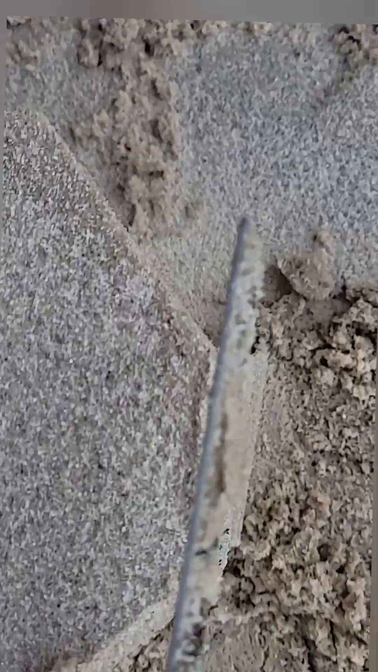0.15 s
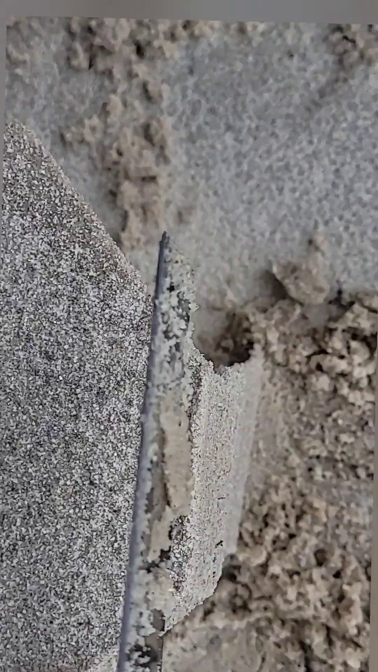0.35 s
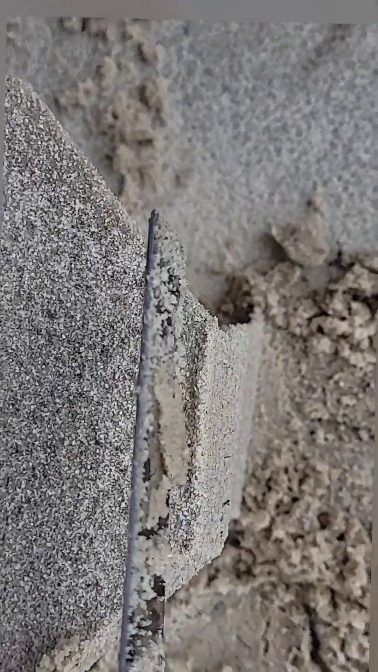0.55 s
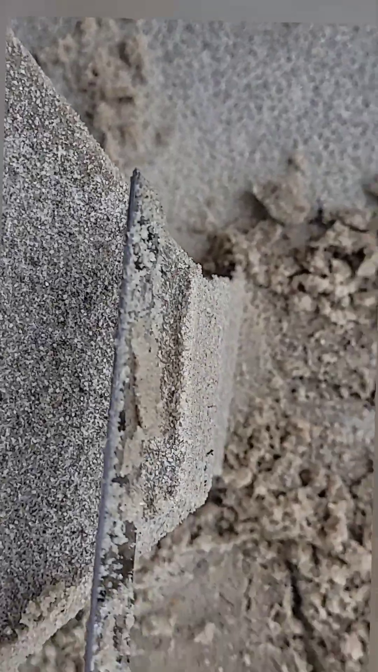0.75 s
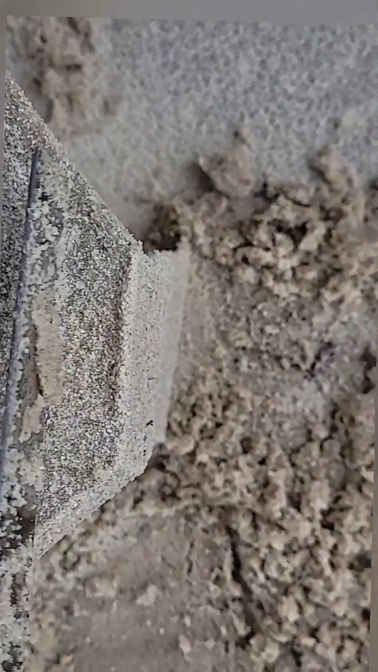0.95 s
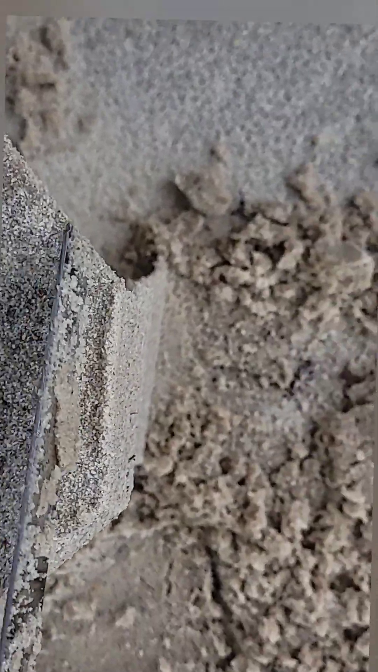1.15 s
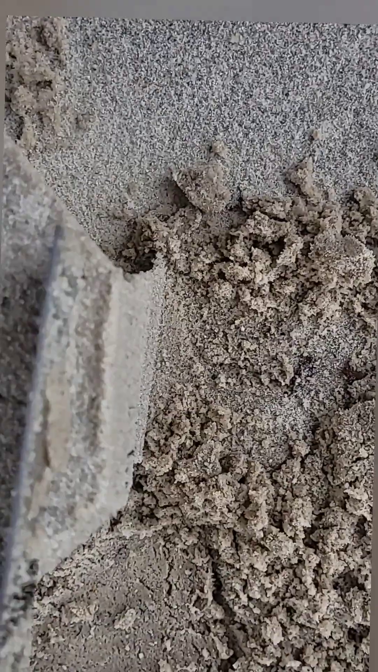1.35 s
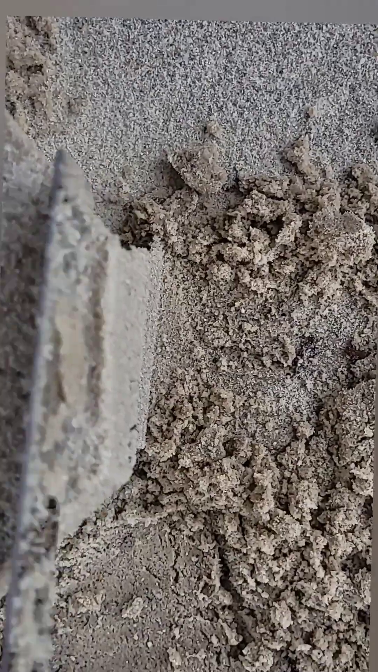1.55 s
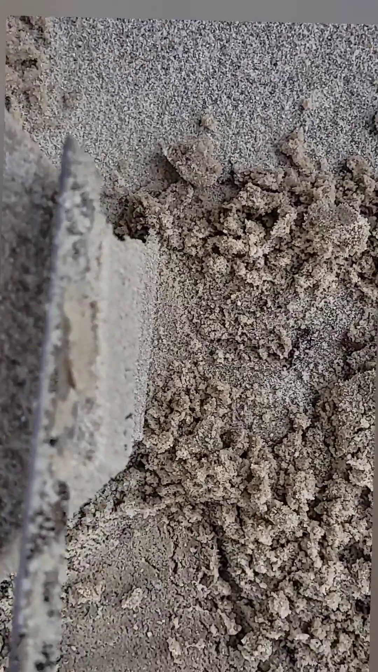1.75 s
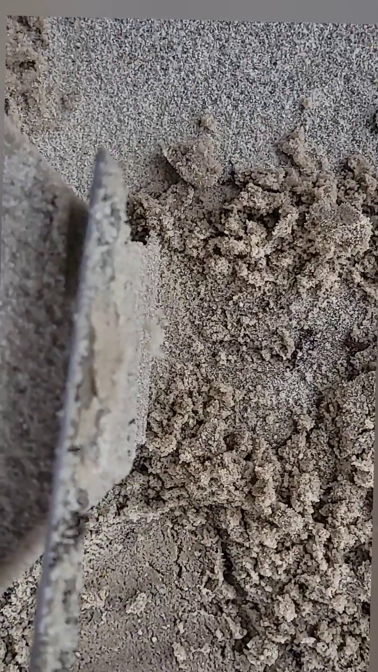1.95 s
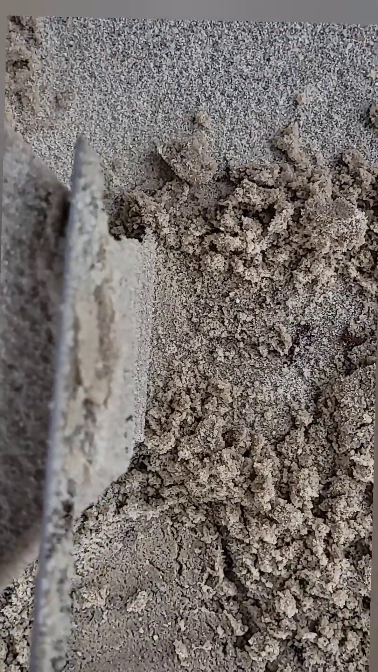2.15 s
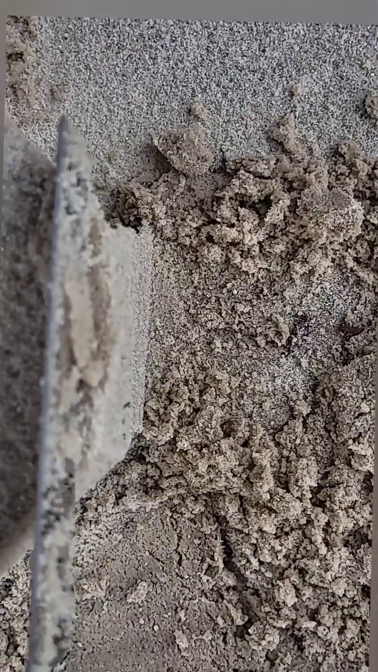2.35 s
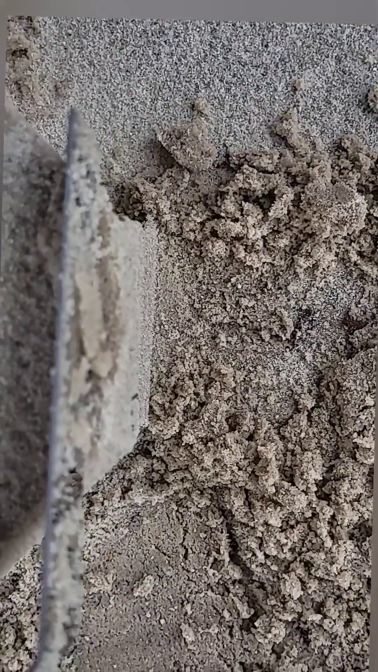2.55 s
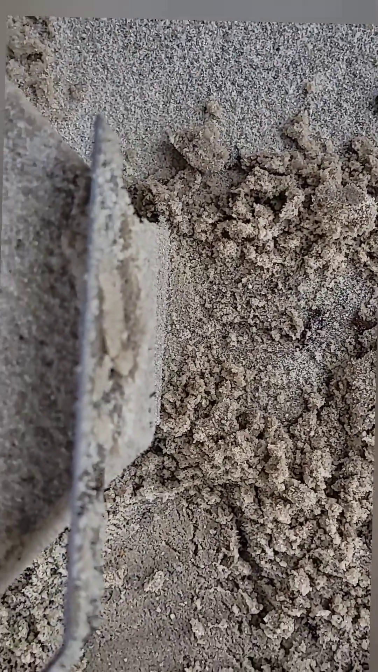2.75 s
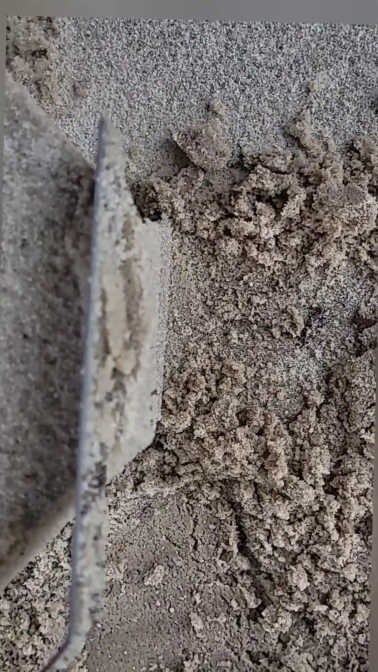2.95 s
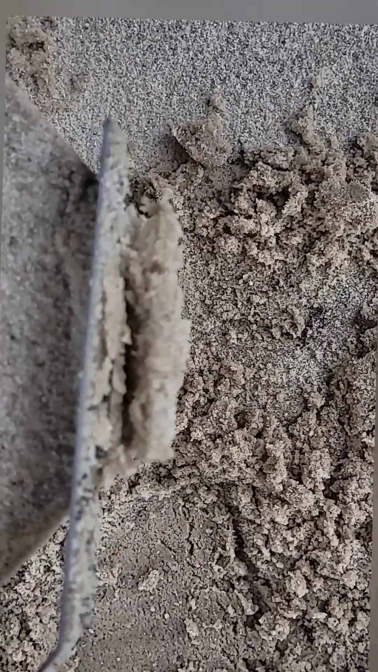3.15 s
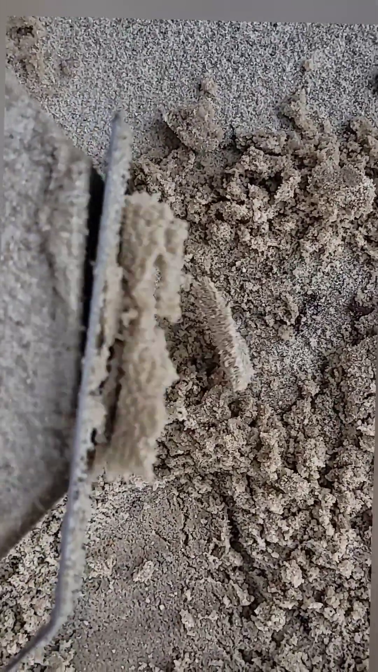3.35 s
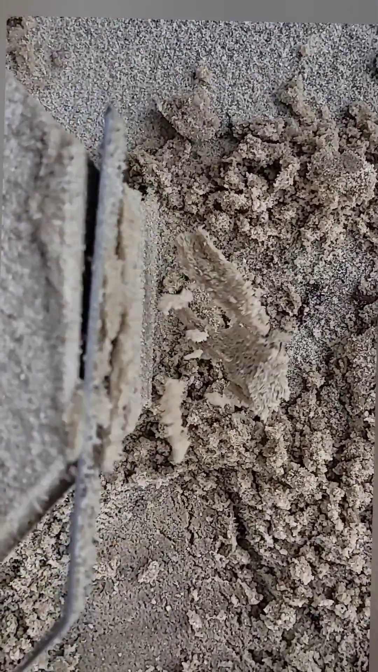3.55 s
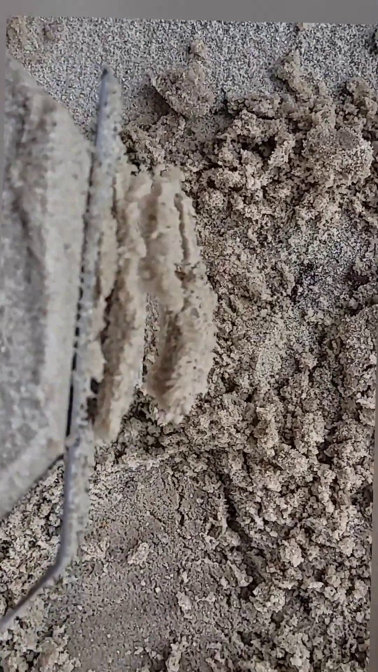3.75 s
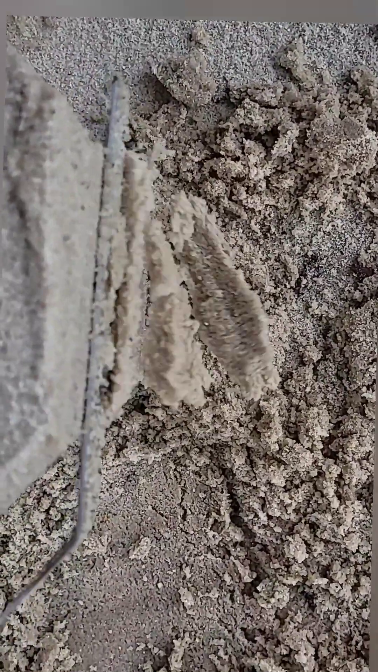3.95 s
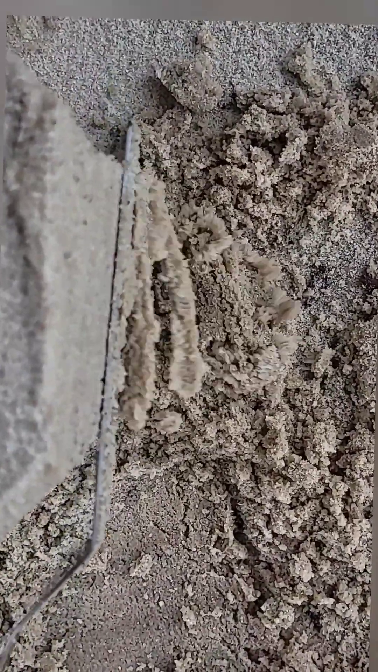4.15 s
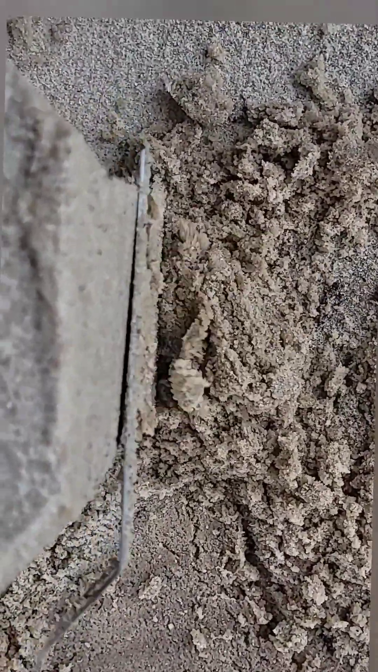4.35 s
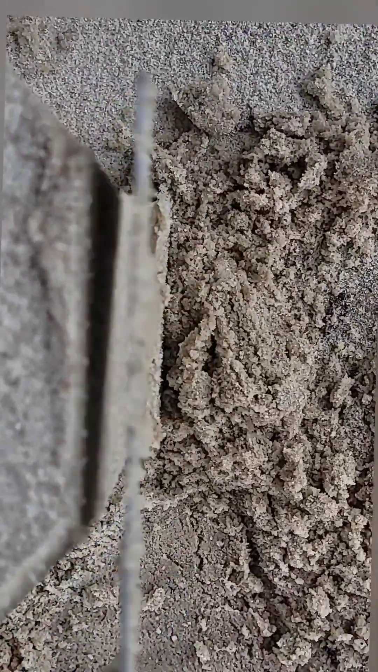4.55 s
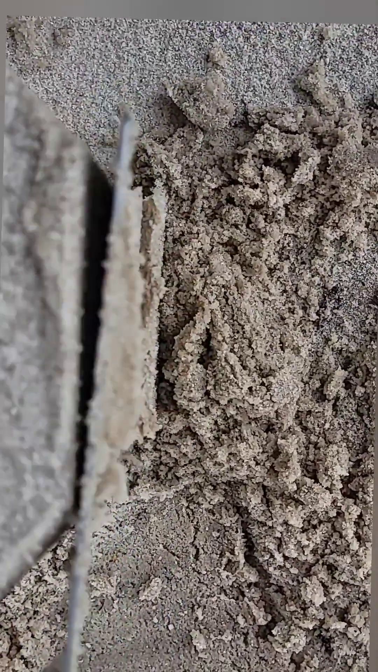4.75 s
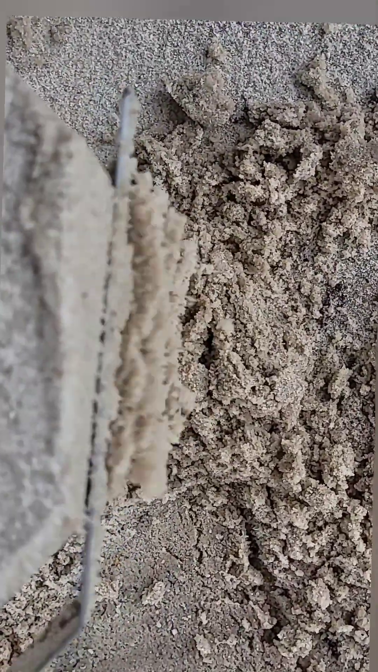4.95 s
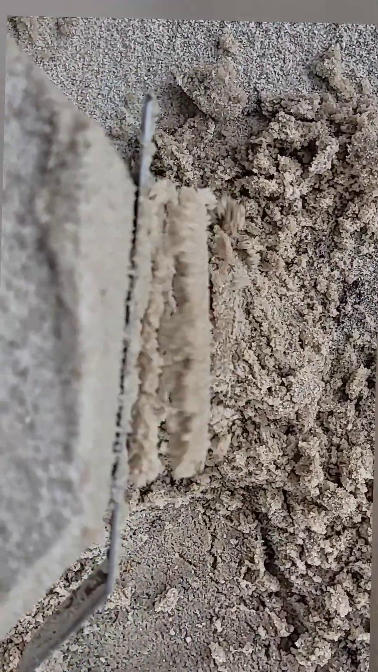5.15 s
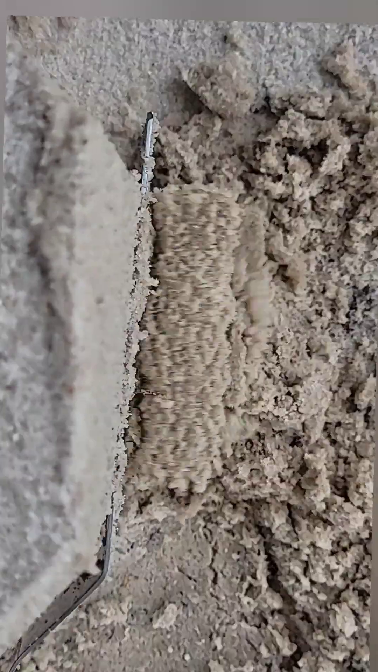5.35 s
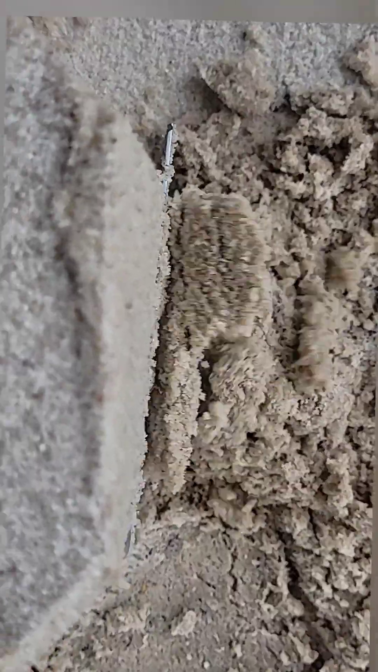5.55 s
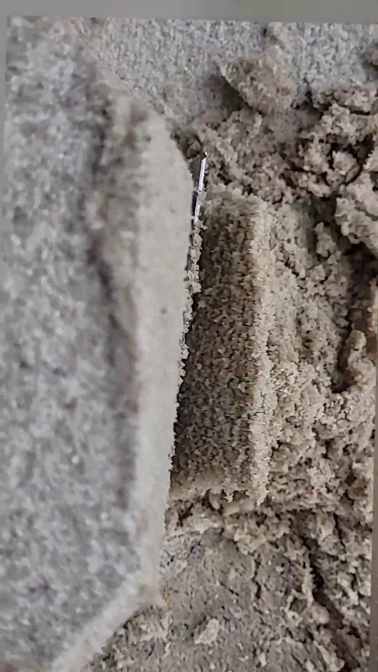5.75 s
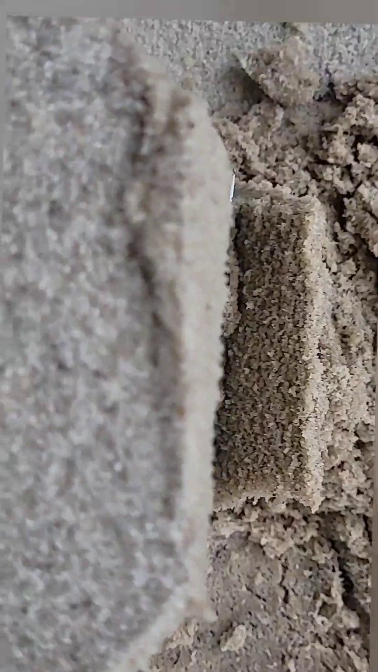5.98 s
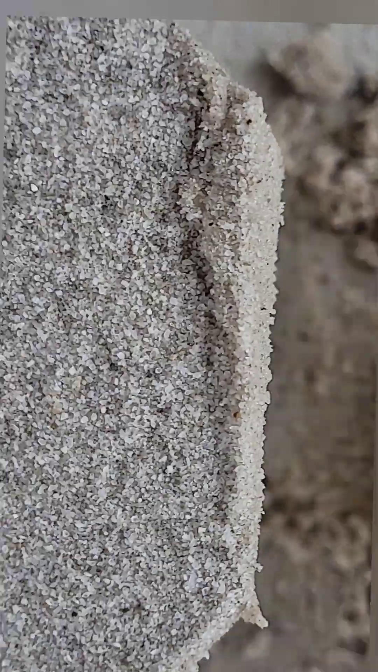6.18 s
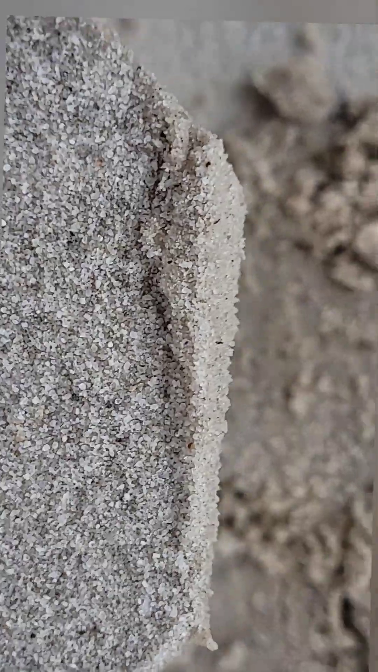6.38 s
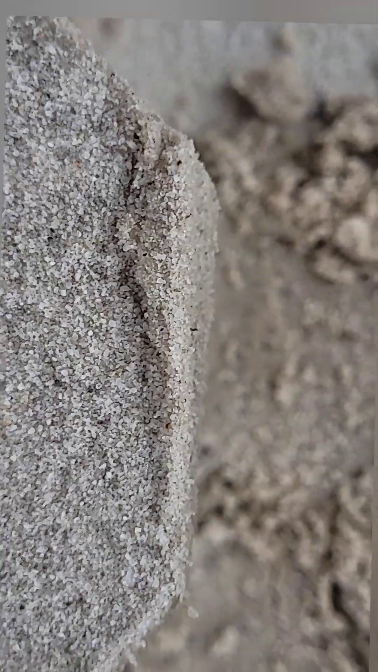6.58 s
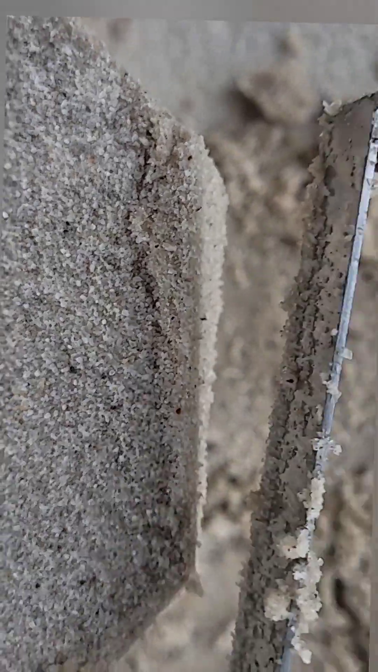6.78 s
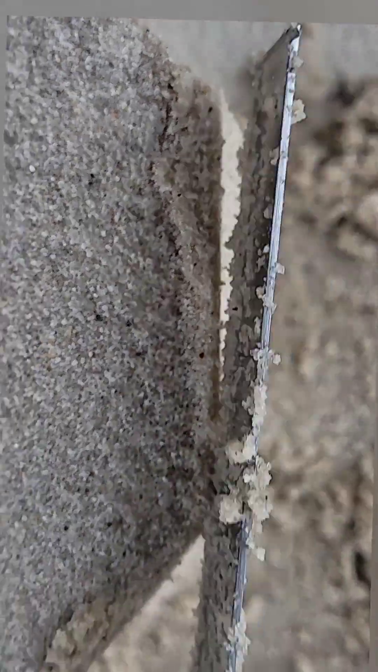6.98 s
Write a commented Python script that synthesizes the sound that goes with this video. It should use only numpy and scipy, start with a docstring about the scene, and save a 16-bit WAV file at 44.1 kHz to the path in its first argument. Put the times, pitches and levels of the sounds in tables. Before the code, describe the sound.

A thin steel blade scrapes and slices damp sand up close, hissing and crunching, while birds chirp and light wind rumbles.

```python
"""A thin steel blade scrapes and slices damp packed sand, outdoors and close to a phone.
Grit hisses under the edge, the sand crunches as it shears, crumbs tick and cut lumps land softly.
Birds whistle and chatter in gliding tones that echo off walls and trees. A hand rubs the phone
at the start; wind buffets its two microphone ports, and a far rumble fills the bass."""
import sys
import numpy as np
from scipy import signal
from scipy.fft import rfft, irfft, next_fast_len
from scipy.io import wavfile
from scipy.ndimage import uniform_filter1d, map_coordinates

SR = 44100
rng = np.random.default_rng(int(sys.argv[2]) if len(sys.argv) > 2 else 0)


def log_audio(samples):
    """Write samples as a 16-bit WAV file to the path given in sys.argv[1]."""
    # one column per channel
    frames = np.atleast_2d(samples).T
    # limit to full scale, then quantise
    limited = np.clip(frames, -1, 1)
    pcm = np.round(limited * 32767).astype(np.int16)
    wavfile.write(sys.argv[1], SR, pcm)


N = 309582

# Stereo image of the sand, wider in the treble: (frequency [Hz], left-right correlation)
SAND_IMAGE = [(300, 0.96), (800, 0.53), (1500, 0.72), (3000, 0.31), (6000, 0.076), (12000, 0.068)]


def blade():
    """Grains slip under the edge as hissing grit; deeper cuts shear the sand and add crunch."""
    # The blade's drag, one curve a stroke: (time [s], grit [dB], crunch above grit [dB])
    strokes = [
        [(0, -68, -2.5), (.16, -74, 9.5), (.3, -77.5, -2.5), (1.42, -82, 4.5), (1.64, -80, 5.5),
         (2.0, -81.5, -9), (2.1, -64, -2), (2.2, -67.5, -1), (2.3, -82, 2)],
        [(2.98, -73, -14), (3.15, -58.5, -4), (3.53, -61.5, -5.5), (3.58, -51.5, -9), (3.87, -47, -7.5),
         (3.925, -56, -6), (4.02, -48, -10.5), (4.14, -51, -11.5), (4.26, -47, -10.5), (4.33, -67, -1.5),
         (4.44, -81, -2)],
        [(4.565, -102, -9), (4.6, -71, -7), (4.69, -65, -12), (4.78, -47, -10), (5.0, -47.5, -7.5),
         (5.58, -46.5, -2), (5.65, -40, -4), (5.8, -39.5, -2), (5.93, -39, 0.5), (6.016, -62.5, 5)],
        [(6.08, -46, -1.5), (6.19, -46, -0.5), (6.226, -50.5, -6), (6.28, -53, -21), (6.36, -64, -2.5),
         (6.415, -69.5, -4), (6.7, -83.5, -22)],
    ]
    # Short shoves of the hand: (time [s], spread [s], level [dB])
    shoves = [(.095, 0.085, -55.5), (1.45, 0.051, -72), (1.571, 0.033, -65), (1.886, 0.11, -72.5),
              (2.095, 0.031, -62.5), (3.124, 0.023, -47), (3.26, 0.11, -59.5), (3.36, 0.066, -44),
              (3.46, 0.11, -56.5), (3.567, 0.041, -50.5), (3.82, 0.061, -46.5), (3.875, 0.019, -46),
              (3.992, 0.068, -44), (4.345, 0.013, -66), (4.99, 0.067, -46), (5.135, 0.07, -43.5),
              (5.24, 0.061, -46), (5.35, 0.063, -42.5), (5.455, 0.042, -44.5), (5.885, 0.02, -52.5),
              (6.192, 0.015, -43.5), (6.33, 0.035, -53.5), (6.381, 0.044, -55.5)]
    # The edge touches a stone: (time [s], level [dB])
    stone_ticks = [(0.152, -59.5), (4.585, -51.5)]
    # Bright hiss of slipping grains: (frequency [Hz], level [dB])
    grit_spectrum = [(880, -78), (1500, -16), (1740, -23.5), (2600, -9.5), (5000, -6), (7900, 0),
                     (8500, -5), (9300, -2), (10700, -3.5), (11600, -6.5), (13200, -4.5), (15800, -4.5)]
    # Midrange bite of shearing sand: (frequency [Hz], level [dB])
    crunch_spectrum = [(450, -24), (620, -21), (780, -11), (1200, -5), (1800, -1.5), (2200, 3.5), (3400, 4),
                       (4300, 0), (6500, -2.5)]
    t = np.arange(N) / SR
    drag_db, crunch_db = curves([row for stroke in strokes for row in stroke])
    drag, shove = amp(drag_db), swells(shoves, steepness=3)
    judder = amp(0.3 * wobble(16) + 1.04 * wobble(55))  # the edge sticks and slips
    slips = grains(per_s=900, spread_db=5, life_s=.00019, bed=4.4)
    grit = noise(grit_spectrum, SAND_IMAGE, patchy_db=1.52, gate=slips, lead_s=.0001)
    snaps = grains(per_s=700, spread_db=3, life_s=.0015, bed=4.5)
    crunch = noise(crunch_spectrum, SAND_IMAGE, patchy_db=2, gate=snaps, lead_s=.0001)
    ticks = sum((t > s) * amp(db - 60 * np.abs(t - s) / .04) for s, db in stone_ticks)
    grit_level = judder * np.hypot(drag, shove) + ticks
    crunch_level = judder * amp(crunch_db) * np.hypot(drag, amp(-6) * shove)  # shoves skim: less crunch
    return grit_level * grit + crunch_level * crunch


def lumps():
    """Cut slices land in soft, grainy thuds."""
    # Slices landing: (time [s], spread [s], level [dB])
    landings = [(3.12, 0.072, -76), (3.369, 0.1, -72.5), (3.601, 0.13, -70), (4.79, 0.085, -69.5),
                (4.88, 0.14, -68.5), (5.02, 0.1, -70), (6.19, 0.092, -67), (6.34, 0.033, -68),
                (6.385, 0.03, -68.5)]
    # Dull body of damp sand: (frequency [Hz], level [dB])
    spectrum = [(200, -8), (350, -10), (600, -9), (900, -9), (1500, -24)]
    crumble = grains(per_s=300, spread_db=2, life_s=.004, bed=1.5)
    return swells(landings) * noise(spectrum, SAND_IMAGE, patchy_db=1.5, gate=crumble)


def crumbs():
    """Crumbs loosened by the first touch tick down, ever fainter."""
    # Tiny, bright impacts: (frequency [Hz], level [dB])
    spectrum = [(3000, -15), (8000, -2.5), (12000, -5.5), (15800, -4.5)]
    level = amp(-84 - 14 * np.arange(N) / SR)  # fades 14 dB a second
    ticks = grains(per_s=20, spread_db=3, life_s=.001, bed=0)
    return level * noise(spectrum, SAND_IMAGE, patchy_db=3, gate=ticks)


def birds():
    """Whistled notes and a chattering bird's chips, as two mono lines: direct sound and echo send."""
    # Whistles by kind of note: (time [s], length [s], middle pitch [Hz], level [dB])
    notes = { "drop": [(2.508, 0.02, 3050, -43), (2.734, 0.014, 3240, -36.5), (2.984, 0.02, 3270, -37.5)],
             "whistle": [(1.962, 0.034, 7340, -63), (2.583, 0.079, 3650, -36.5), (2.814, .078, 3780, -39),
             (3.056, .092, 3820, -38.5)], "slur": [(2.04, 0.035, 2890, -57), (2.455, .06, 3020, -58.5),
             (2.655, 0.1, 3090, -51.5), (2.872, .07, 3016, -51), (3.143, .025, 2900, -74)],
             "fall": [(.225, 0.046, 2180, -53.5), (.285, .04, 2364, -63.5), (.386, .034, 2950, -62),
             (.42, 0.034, 1780, -68.5), (.847, 0.029, 3056, -54.5), (.89, 0.054, 1656, -78),
             (1.314, 0.037, 2050, -60), (1.355, 0.024, 2280, -59.5), (1.425, .05, 2920, -53.5),
             (1.485, 0.029, 1760, -64.5), (5.5, 0.036, 2795, -50), (5.608, 0.026, 2800, -48),
             (6.782, 0.0307, 2710, -59), (6.8, .05, 2170, -66)], "level": [(.357, 0.034, 3070, -60),
             (.705, 0.076, 2170, -69), (.775, .03, 2380, -67), (1.095, 0.14, 1900, -75),
             (1.31, 0.036, 7090, -58.5), (2.008, 0.071, 1880, -64), (2.086, 0.028, 2446, -49),
             (2.128, 0.028, 2586, -47.5), (2.27, 0.016, 2830, -52), (4.596, 0.021, 2330, -59),
             (6.354, .05, 2437, -60), (6.392, 0.065, 2730, -52.5), (6.456, 0.085, 2665, -57),
             (6.486, 0.02, 3560, -51), (6.565, 0.058, 2500, -58.5), (6.72, 0.036, 3600, -57),
             (6.76, .045, 6420, -64), (6.995, 0.036, 3490, -56.5)], "arch": [(.669, 0.2, 8180, -73.5),
             (.909, 0.066, 7200, -66), (4.427, 0.11, 8130, -72), (6.026, 0.077, 2920, -48)], }
    # Glide of each kind: (start pitch [x middle], end pitch [x middle])
    glides = {"drop": (1.24, .85), "whistle": (.8, 1.06), "slur": (.62, 1.03), "fall": (1.08, .88),
              "level": (.97, 1.02), "arch": (.88, .87)}
    # Short chips: (time [s], middle pitch [Hz], level [dB])
    chips = [(2.55, 2520, -52.5), (2.771, 2354, -46.5), (2.924, 2770, -53), (3.021, 2750, -49),
             (3.369, 2670, -44.5), (3.41, 2380, -52), (3.518, 2460, -52), (3.563, 2700, -50),
             (3.585, 2320, -47), (3.619, 2240, -48.5), (3.71, 2530, -48.5), (3.787, 2770, -45.5),
             (3.81, 2500, -49), (3.861, 2205, -54), (3.94, 2600, -46), (3.99, 2270, -49),
             (4.067, 2484, -48.5), (4.101, 2460, -46), (4.261, 2573, -47.5), (4.295, 2410, -46.5),
             (4.345, 2400, -70), (4.774, 2174, -55), (4.983, 2960, -57)]
    lines = np.zeros((2, N))
    for kind, rows in notes.items():
        first, last = glides[kind]
        for s, length, hz, db in rows:
            add_chirp(lines, s, length, [hz * first, hz, hz * last], db)
    scatter = rng.normal(0, .04, (len(chips), 2))  # each chip bends differently
    for (s, hz, db), (first, last) in zip(chips, scatter):
        add_chirp(lines, s, .02, [hz * (1.06 + first), hz, hz * (1 + last)], db)
    return lines


def add_chirp(lines, start_s, length_s, glide_hz, db):
    """Adds one bird note, a gliding sine with a weak octave; faint, far notes waver and echo more."""
    near_db, far_span_db, waver_hz = -38, 22, 70
    far = np.clip((near_db - db) / far_span_db, 0, 1)
    u = np.linspace(0, 1, int(length_s * SR))
    pitch = uniform_filter1d(np.interp(u, [0, .5, 1], glide_hz), size=len(u) // 3, mode="nearest")
    knots = rng.standard_normal((2, 3 + int(200 * length_s)))
    waver, flutter = (np.interp(u, np.linspace(0, 1, len(k)), k) for k in knots)
    phase = 2 * np.pi * np.cumsum(pitch + waver_hz * far * waver) / SR
    tone = np.sin(phase) + amp(-25) * np.sin(2 * phase)
    skew = 1.5 if glide_hz[2] > 1.15 * glide_hz[0] else .8  # steep rises swell late, the rest early
    swell = np.sin(np.pi * u ** skew) ** .6
    note = amp(db + (2.0 + 5.1 * far) * flutter) * swell * tone
    start = int(start_s * SR)
    span = lines[:, start:start + len(u)]
    span += amp([[-5 * far], [3.5 * far]]) * note[:span.shape[1]]  # direct, echo send


def chorus():
    """Distant birds scatter falling chirps; only their echoes arrive, so this is an echo send."""
    # Ebb and flow of the flock: (time [s], send level [dB])
    activity = [(0, -63), (.5, -64.5), (1.5, -79.5), (2.2, -64.5), (3.2, -67), (4.5, -64), (7.02, -89)]
    lines = np.zeros((2, N))
    for when, pitch, slur, size in rng.random((260, 4)):
        hz = 2150 * 1.45 ** pitch
        glide_hz = [hz * (1 + .168 * slur), hz, hz * (1 - .11 * slur)]
        add_chirp(lines, when * N / SR, .035, glide_hz, db=8 * size - 65)
    return amp(curves(activity)[0]) * unit(lines[1])


def yard_echoes(send):
    """Walls and trees answer late; moving air renews the echo pattern every quarter second."""
    # Reverb of the yard: (frequency [Hz], time to fall 60 dB [s])
    decay_times = [(2000, .45), (3000, .5), (4000, .33), (7000, .25)]
    blurred = send * (.7 + wobble(400))  # stirring leaves blur each pitch
    out, step = np.zeros((2, N + SR)), SR // 4
    for start in range(0, N, step):
        hz, t, bins = signal.stft(rng.standard_normal((2, 2 * SR // 3)), SR, nperseg=256)
        build = 1 - np.exp(-t / .015)
        decay = amp(-60 * t / along(decay_times, hz)[:, None])
        tail = signal.istft(bins * build * decay, SR, nperseg=256)[1]
        tail /= np.linalg.norm(tail[0])
        wet = signal.fftconvolve(blurred[None, start:start + step], tail, axes=1)
        out[:, start:start + wet.shape[1]] += wet
    return out[:, :N]


def hand():
    """Fingers rub the phone's shell; above its first mode the two ports move in opposition."""
    # The grip shifts: (time [s], level [dB])
    grip = [(0.0, -61), (0.088, -44), (0.165, -56.5), (.19, -67), (.26, -106)]
    # Resonances of the shell: (frequency [Hz], level [dB])
    shell = [(200, -6.5), (370, 1), (600, -11.5), (760, -3.5), (950, -12.5), (1600, -11), (2200, -34)]
    image = [(370, .1), (520, -.17), (760, -.6)]
    friction = grains(per_s=200, spread_db=2.1, life_s=.0074, bed=1)
    return amp(curves(grip)[0]) * noise(shell, image, patchy_db=3.4, gate=friction)


def wind():
    """Lumpy buffeting and knocks on the ports, over a steadier far rumble."""
    # Strength of the wind: (time [s], buffet [dB], rumble above buffet [dB])
    strength = [(0.0, -53.5, -3), (0.66, -61.5, 7), (0.86, -50, -4.5), (1.02, -55, -4.5),
                (1.52, -65.5, 5.5), (1.7, -59, 0.5), (3.5, -68.5, -3), (3.71, -63, 0), (4.52, -72, 0.5),
                (5.81, -67.5, 5), (7.02, -71.5, -5.5)]
    # The buffeting leans from port to port: (time [s], left boost and right cut [dB])
    lean = [(0, -1.5), (2.2, 3.5), (2.8, -2.3)]
    # Deep turbulence at the ports: (frequency [Hz], level [dB])
    buffet_spectrum = [(12, -34), (20, -16), (59, 8), (130, -6), (170, -24), (290, -120)]
    # Far rumble: (frequency [Hz], level [dB])
    rumble_spectrum = [(70, -12), (115, 2), (170, -6), (230, -6), (330, -18), (450, -40)]
    # Gusts that knock the ports: (time [s], level [dB])
    thumps = [(0.836, -35), (0.884, -48), (0.971, -49)]
    buffet_db, rumble_db = curves(strength)
    gusts = amp(3.8 * np.array([wobble(11), wobble(6.4)]))  # each port has its own
    pan = amp(curves(lean)[0] * [[1], [-1]])
    turbulence = noise(buffet_spectrum, image=[(30, .38), (110, 1)], patchy_db=.31)
    buffet = pan * amp(buffet_db) * unit(gusts * turbulence)
    rumble = noise(rumble_spectrum, image=[(110, 1), (330, .82)], patchy_db=1)
    knocks, knock_hz = np.zeros(N), 66
    for s, db in thumps:
        age = np.clip(np.arange(N) / SR - s, 0, 1)
        envelope = amp(db - 60 * age / .09) * (1 - np.exp(-age / .003))
        knocks += envelope * np.sin(2 * np.pi * knock_hz * age)
    return buffet + amp(buffet_db + rumble_db) * rumble + amp([[5], [-5]]) * knocks


def open_air():
    """A faint, wide, almost steady hiss of open air."""
    # Outdoor noise bed: (frequency [Hz], level [dB])
    spectrum = [(210, 3), (350, -3.5), (641, -12.5), (815, -11.5), (1810, -16.5), (1990, -33.5),
                (2650, -19), (5180, -19), (6270, -7), (15800, -49)]
    level = amp(-78 + .22 * wobble(2.8))
    return level * noise(spectrum, image=[(350, .39), (1200, .038)], patchy_db=.76)


def grains(per_s, spread_db, life_s, bed):
    """Gate of tiny snaps: random instants and sizes, each dying fast, over a steady bed."""
    hits = rng.random(N) < per_s / SR
    size = np.minimum(rng.exponential(1, N), 3)
    snaps = hits * amp(spread_db * size)
    return bed + unit(signal.lfilter([1], [1, -np.exp(-1 / (life_s * SR))], snaps))


def noise(spectrum, image, patchy_db, gate=1, lead_s=0):
    """Gated stereo noise of rms 1; image is (frequency [Hz], correlation); left leads by lead_s."""
    bins = signal.stft(gate * rng.standard_normal((2, N)), nperseg=256)[2]
    patches = uniform_filter1d(rng.standard_normal(bins.shape[1:]), size=7, axis=0)
    patches = uniform_filter1d(patches, size=8, axis=1)  # random gain, smooth in frequency and time
    pair = signal.istft(bins * amp(patchy_db * unit(patches)), nperseg=256)[1][:, :N]
    band = [(1, -120)] + list(spectrum) + [(SR, -120)]

    def colour_and_width(hz):
        angle = np.arccos(np.clip(along(image, hz), -1, 1)) / 2
        return amp(along(band, hz)) * [np.cos(angle), np.sin(angle)]

    mid, side = filtered(pair, colour_and_width)
    return unit(np.array([mid + side, np.roll(mid - side, round(lead_s * SR))]))


def swells(rows, steepness=2):
    """Bell-shaped swells from (time [s], spread [s], level [dB]); steeper ones have flatter tops."""
    t = np.arange(N) / SR
    return sum(amp(db) * np.exp(-np.abs(2 * (t - s) / spread) ** steepness) for s, spread, db in rows)


def wobble(rate):
    """A smooth random curve, rate knots a second."""
    return map_coordinates(rng.standard_normal(int(N * rate / SR) + 4), [np.arange(N) * rate / SR])


def curves(rows):
    """One value per sample for each column after the time."""
    times, *columns = np.transpose(rows)
    return [np.interp(np.arange(N) / SR, times, column) for column in columns]


def along(points, hz):
    """Reads (frequency [Hz], value) points on a log axis."""
    freqs, values = np.transpose(points)
    return np.interp(np.log(hz + 1), np.log(freqs + 1), values)


def filtered(x, response):
    """Equalises x by a gain that is a function of frequency."""
    size = next_fast_len(N + SR // 2)
    return irfft(rfft(x, size) * response(np.fft.rfftfreq(size, 1 / SR)), size)[..., :N]


def amp(db):
    return 10 ** (np.asarray(db) / 20)


def unit(x):
    return x / np.sqrt(np.mean(x ** 2) + 1e-20)


def scene():
    """Sand up close, birds and their echoes around it, wind and air underneath."""
    direct, send = birds()
    song = np.array([direct, np.roll(direct, 4)])  # the birds reach the left port first
    echoes = amp(-12.5) * yard_echoes(send + chorus())
    return blade() + lumps() + crumbs() + song + echoes + hand() + wind() + open_air()


def record(dry):
    """The phone's two ports differ in colour, and nothing is kept above the band limit."""
    # Imbalance of the ports: (frequency [Hz], left minus right [dB])
    imbalance = [(60, 2), (150, 0.5), (380, 0.5), (950, -3.5), (2380, -4.5), (5980, -1), (15000, -5.5)]
    top_hz = 15760
    return filtered(dry, lambda hz: amp(along(imbalance, hz) * [[.5], [-.5]]) * (hz < top_hz))


dry = scene()
out = record(dry)
log_audio(out)
```